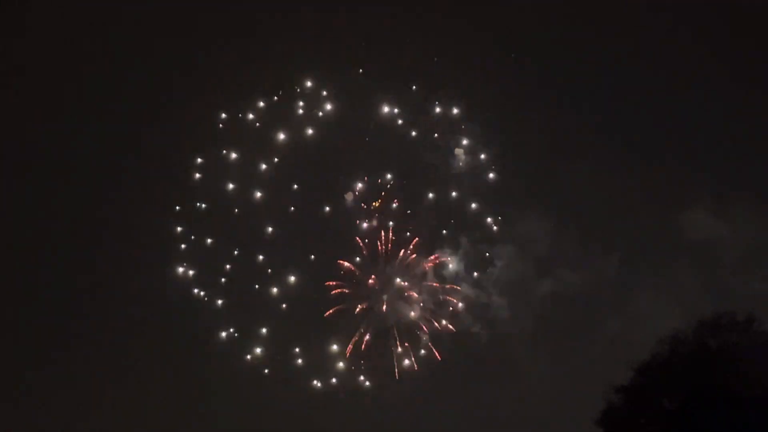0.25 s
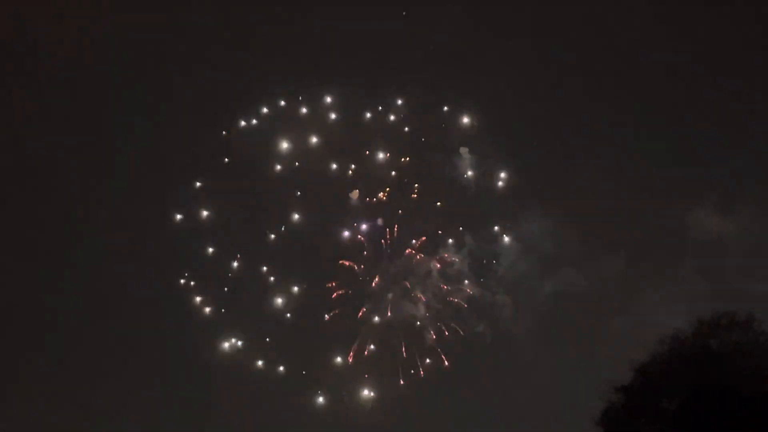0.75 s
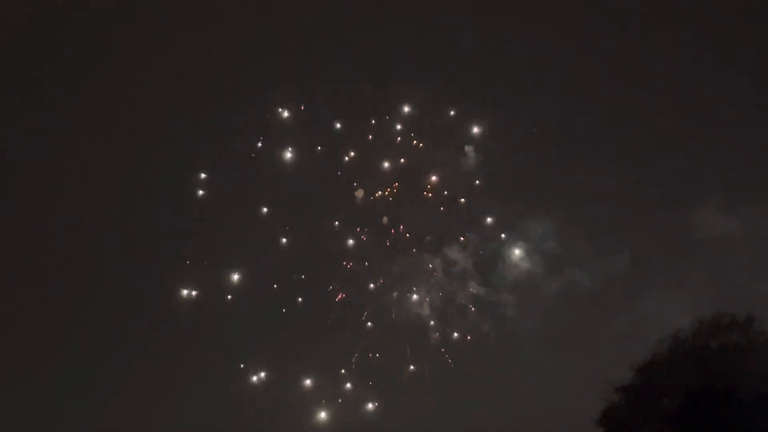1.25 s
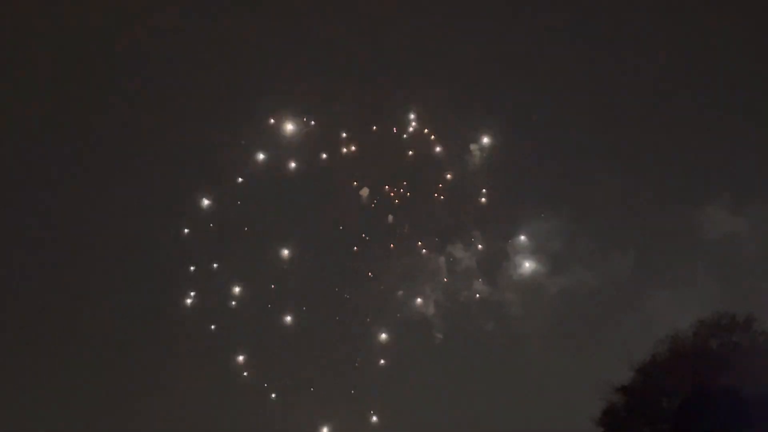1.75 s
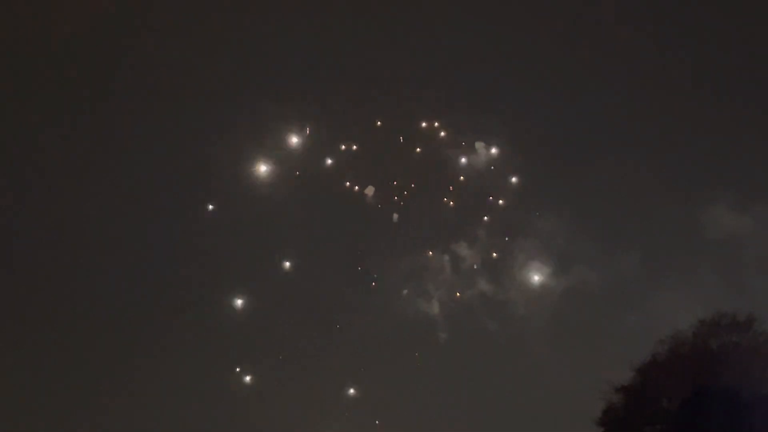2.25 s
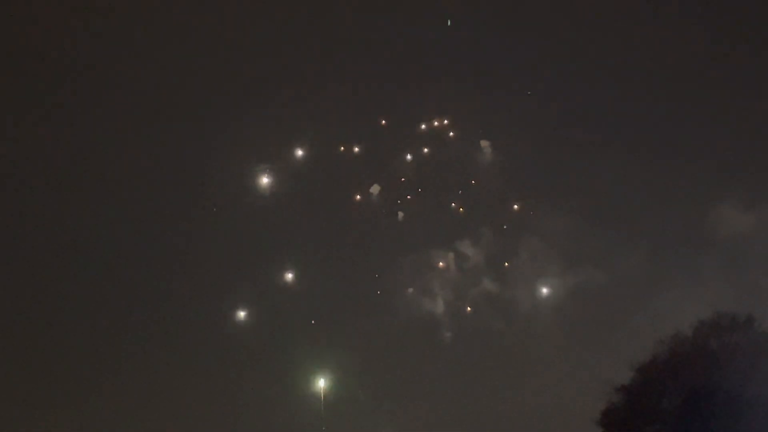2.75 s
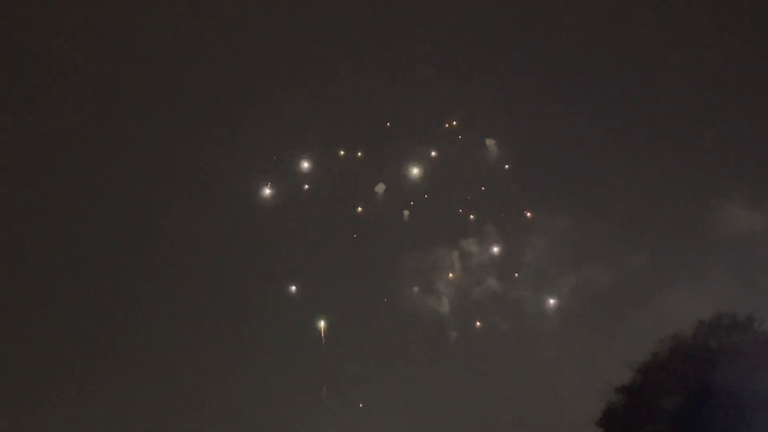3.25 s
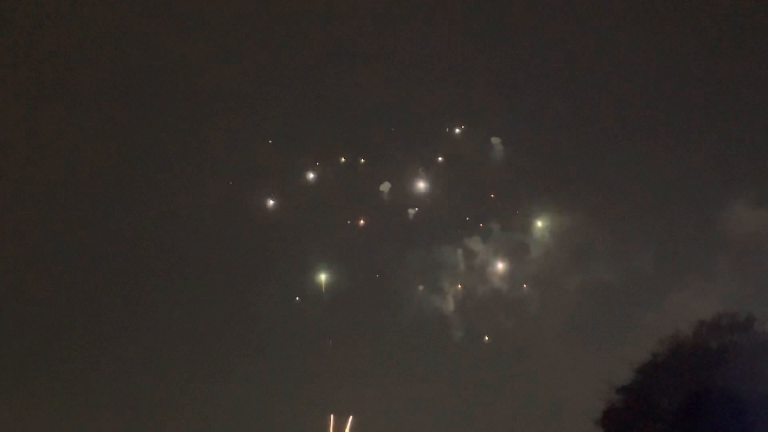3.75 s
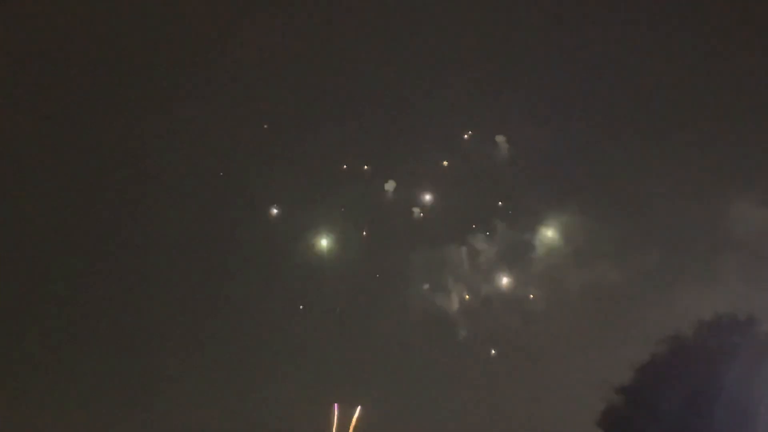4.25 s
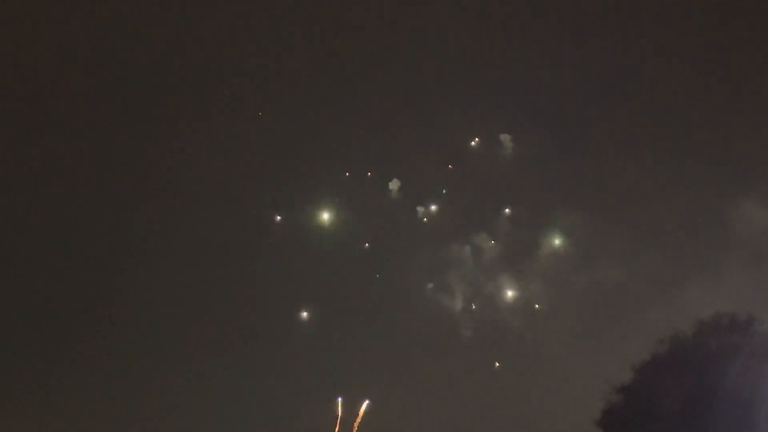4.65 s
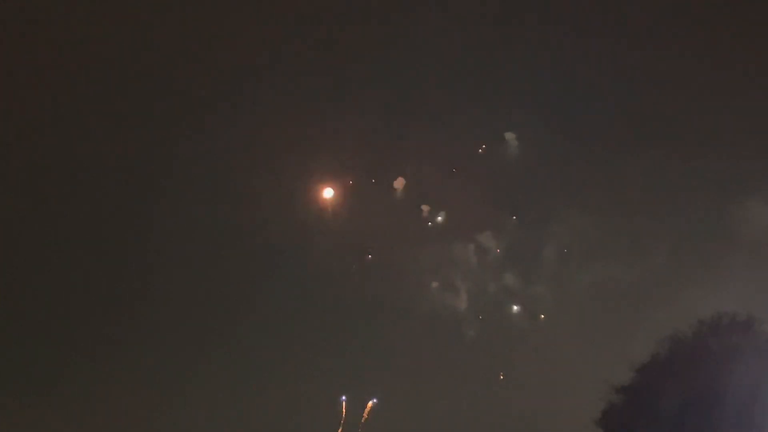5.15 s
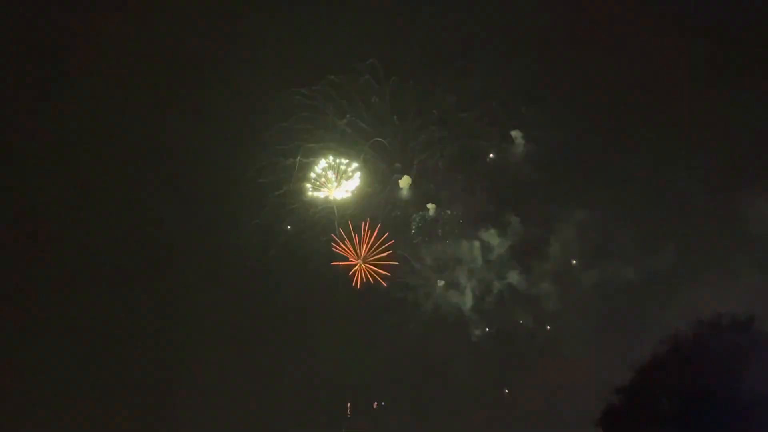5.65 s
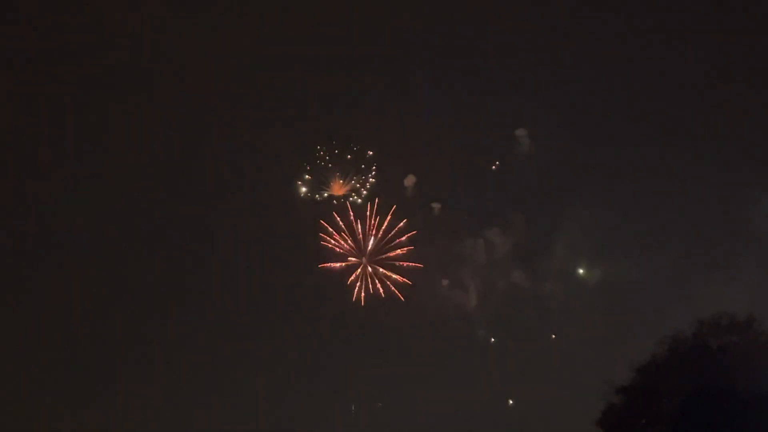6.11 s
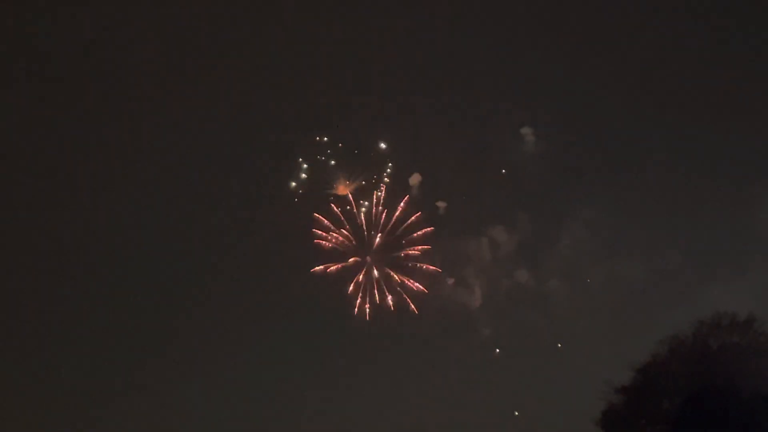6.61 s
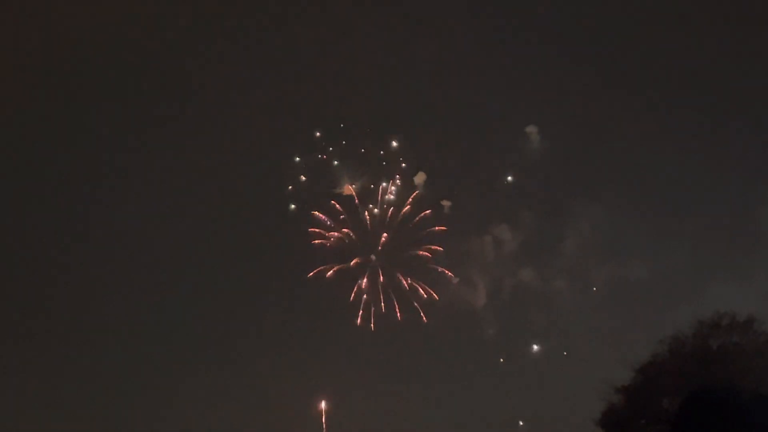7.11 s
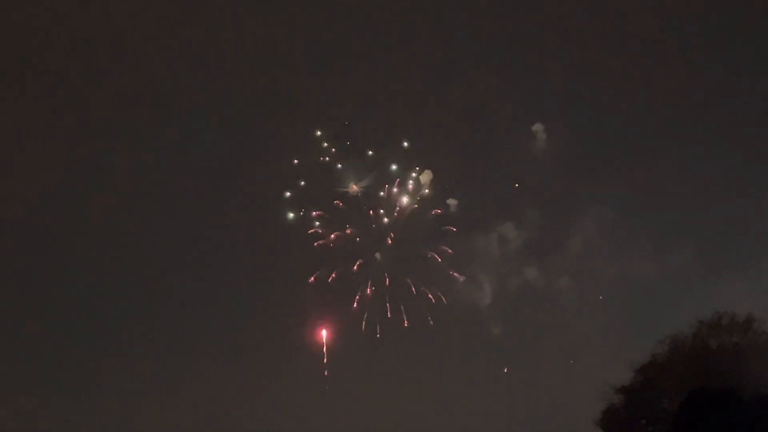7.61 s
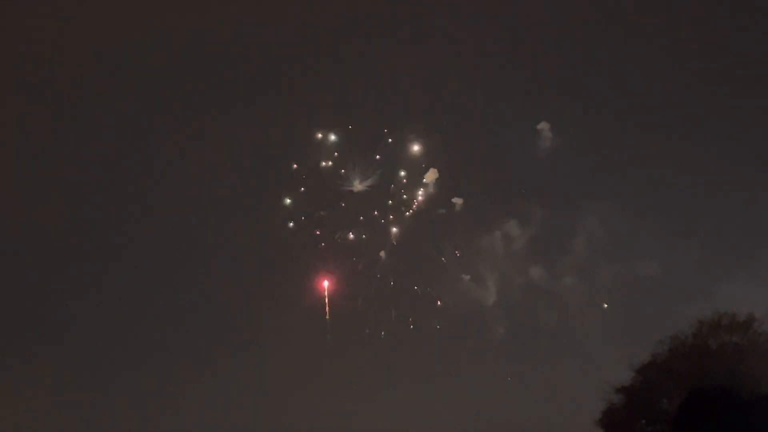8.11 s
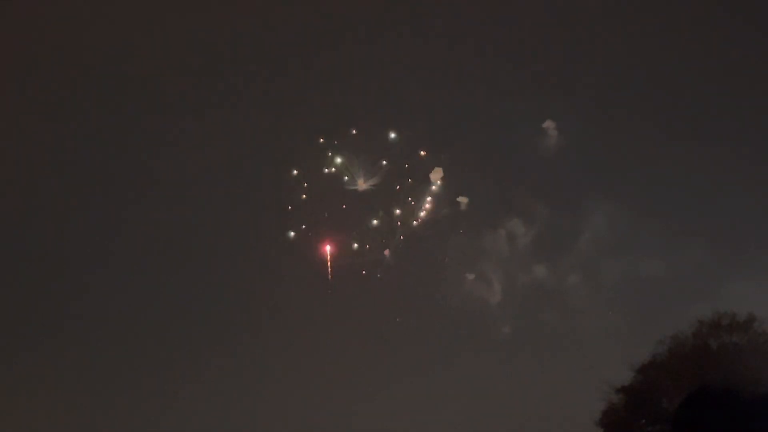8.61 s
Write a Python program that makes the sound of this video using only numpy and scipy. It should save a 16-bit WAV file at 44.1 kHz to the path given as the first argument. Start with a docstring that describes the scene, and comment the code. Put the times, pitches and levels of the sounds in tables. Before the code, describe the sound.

Spaced aerial firework bangs, each a hard crack falling into a deep boom, with quick echoes and a long rolling tail. Between them come ground mortar thumps, dull far thuds and soft distant pops. A low rumble and airy roar swell after every blast and sink in the pauses, over very faint high hiss. Open night field with trees and buildings around, closely spaced stereo microphones.

```python
"""A low rumble opens the scene and a shell soon cracks overhead: a firework display on a night field.
Shells and ground mortars are shaped pressure pulses, each with a quick reflection, near scatter,
slap echoes from buildings, a long roll and a soft swell from the far landscape.
Smeared pulses make far pops and thuds; shaped noise makes the rumble that sinks in the pauses,
the roar, the wash and a faint rustling hiss; a modulated tone makes a thin whine."""
import sys
import numpy as np
from scipy import signal
from scipy.fft import rfft, irfft, next_fast_len
from scipy.io import wavfile
from scipy.ndimage import uniform_filter1d, minimum_filter1d

SR = 44100
rng = np.random.default_rng(int(sys.argv[2]) if len(sys.argv) > 2 else 0)


def to_wav(sig):
    """Store sig (one row per channel, or 1-D mono) as 16-bit WAV at the path in sys.argv[1].

    Samples outside -1..1 are clipped; the rate is SR.
    """
    pcm = np.clip(np.atleast_2d(sig), -1, 1) * 32767
    pcm = np.round(pcm).astype(np.int16)
    wavfile.write(sys.argv[1], SR, pcm.T)  # frames by channels


N = 391166
# pulse filter length [samples] and its frequency axis [Hz]
TAPS = 8192
HZ = np.fft.rfftfreq(TAPS, 1 / SR)
# room ahead of a crack for its earliest paths [samples]
LEAD_IN = 512

# shells bursting overhead: (time [s], level [dB], crack gain [dB], top treble gain [dB],
#   body [Hz], body gain [dB], ground dip [Hz], ground dip gain [dB],
#   reflection delay [ms], reflection share [1], extra echo delay [ms], slap level [dB], slap [Hz])
BURSTS = [(0.3875, 1, 3.5, -7, 398, 18.5, 220, -8, 1.29, 0.45, 0.5, -12.5, 500),
          (1.8940, 3, 1.5, 6.5, 261, 10, 1020, -1, 2.67, 0.7, 5, -14.5, 450),
          (7.1675, 4, 6, -3, 357, 14, 1140, -16, 3.77, 0.9, 10.5, -15, 694)]
# mortars launching shells: the same columns as BURSTS
LIFTS = [(3.918, 2.5, -0.5, 3, 950, 10.8, 1124, -8, 1.1, 0.14, 0.97, -13, 434),
         (4.3089, -2.5, 1.5, -2, 820, 13.4, 437, -36, 1.385, 0.71, 0, -11.5, 720),
         (8.4112, 1, -7.5, 5, 1313, 7.8, 325, -2, 2.21, 1, 0, -11.5, 2600)]


def blasts(rows, colour, echoes, turns, lag_hz, ragged, spread_s, clean, near_db, roll_db,
           body_width=0.3, dip_width=0.13):
    """Superposition: the direct pulse, a quick reflection, scatter, slap echoes and roll add linearly."""
    # scatter from nearby trees: spectrum (frequency [Hz], level [dB]), decay (frequency [Hz], T60 [s])
    near_colour, near_t60 = [(60, -11.5), (250, -13.5), (700, -19.5), (2000, -19.5), (6000, -18)], [(60, 0.041), (500, 0.21), (2000, 0.15), (7000, 0.14)]
    # the long roll: spectrum (frequency [Hz], level [dB]), decay (frequency [Hz], T60 [s])
    roll_colour, roll_t60 = [(60, -6.5), (250, -14), (700, -15), (2000, -17), (6000, -14.5)], [(60, 2.74), (300, 2.4), (1000, 2), (3000, 1.75),
                                                  (7000, 0.42)]
    out = np.zeros((2, N))
    treble = HZ / (HZ + 800)
    top = HZ ** 2 / (HZ ** 2 + 4000 ** 2)
    for (s, db, crack_db, top_db, body_hz, body_db, dip_hz, dip_db,
         bounce_ms, bounce, extra_ms, slap_db, slap_hz) in rows:
        spectrum = read(colour, HZ) + crack_db * treble + top_db * top
        # the charge favours one band; soft ground swallows another
        body = body_db * band(body_hz, body_width)
        dip = dip_db * band(dip_hz, dip_width)
        direct = amp(db) * pulse(spectrum + body + dip, turns, lag_hz)
        direct = roughen(direct, ragged, spread_s)
        t = np.arange(len(direct)) / SR
        delayed = np.interp(t - bounce_ms / 10 ** 3, t, direct, left=0)
        reflection = np.clip(bounce, 0, 1) * delayed
        add(out, s - LEAD_IN / SR, direct + reflection)

        # trees and walls return the blast in uneven clumps
        wave = amp(db) * pulse(spectrum + body / 2, turns, lag_hz)
        near = tail(near_colour, near_t60, rise_s=0.0009, size=SR // 2)
        roll = tail(roll_colour, roll_t60, rise_s=0.098)
        roll = roll * lumps(2 * SR, rate=62, depth_db=3.5)
        add(out, s, amp(near_db) * convolve(wave, near))
        add(out, s, amp(roll_db) * convolve(wave, roll))

        # a facade favours one band in its slap
        facade = 7 * band(slap_hz, 0.38)
        for later_s, echo_db, treble_db, smear_s in echoes:
            # the longer path through the air dulls the slap by 1 dB per kHz
            slap_spectrum = spectrum + facade + treble_db * treble - HZ / 1000
            slap = amp(db + slap_db + echo_db) * pulse(slap_spectrum, turns, lag_hz)
            slap = convolve(roughen(slap, ragged, spread_s), scatter(smear_s, clean))
            add(out, s + later_s + extra_ms / 10 ** 3 - LEAD_IN / SR, slap)
    return out


def band(centre_hz, width):
    """Resonance shape: a bell of peak 1 on a log-frequency axis, its width a natural-log ratio."""
    return np.exp(-(np.log((HZ + 1) / centre_hz) / width) ** 2)


def pulse(db, turns=2.5, lag_hz=150):
    """Dispersion: a pulse of peak 1 whose bass arrives late, so it sweeps down from crack to boom."""
    log_gain = np.log(amp(np.maximum(db, -100)))
    # minimum phase: the Hilbert transform of the log gain gives the causal phase
    mirrored = np.r_[log_gain, log_gain[-2:0:-1]]
    causal = np.exp(np.conj(signal.hilbert(mirrored)))[:len(HZ)]
    dispersion = np.exp(-2j * np.pi * turns * HZ / (HZ + lag_hz))
    wave = irfft(causal * dispersion)[:TAPS // 2]
    return wave / abs(wave).max()


def roughen(wave, share, spread_s):
    """Multipath: uneven air splits the crack into early and late paths; the bass passes whole."""
    t = (np.arange(TAPS) - LEAD_IN) / SR
    paths = rng.standard_normal(TAPS) * np.exp(-abs(t) / spread_s)
    split = np.clip(share, 0, .95) * HZ ** 2 / (HZ ** 2 + 400 ** 2)
    whole = np.sqrt(1 - split) * rfft(1. * (t == 0))
    spread = np.sqrt(split) * rfft(paths / np.linalg.norm(paths))
    return irfft(rfft(wave, TAPS) * shallow(whole + spread))[:TAPS // 2]


def scatter(smear_s, clean):
    """Diffuse reflection: the bass returns clean, the treble partly as a dying spray."""
    spray = noise_pair(TAPS) * np.exp(-np.arange(TAPS) / SR / smear_s)
    spray = spray / np.linalg.norm(spray[0])
    split = (1 - np.clip(clean, 0, 1)) * HZ ** 2 / (HZ ** 2 + 200 ** 2)
    transfer = np.sqrt(1 - split) + np.sqrt(split) * rfft(spray)
    return irfft(shallow(transfer))[:, :TAPS // 2]


def shallow(transfer):
    """Interference softened: evens a many-path transfer's peaks and notches, keeping its time spread."""
    return transfer * np.sqrt(2 / (abs(transfer) ** 2 + .5)) * np.sqrt(np.pi) / 2


def tail(colour, t60, rise_s, size=2 * SR):
    """Reverberant decay: countless faint reflections, each band dying at its own speed."""
    hz, t, z = signal.stft(noise_pair(size), SR, nperseg=512)
    life = read(t60, hz)[:, None]
    decay = amp(read(colour, hz)[:, None] - 60 * t / life)
    # compensates the energy that a longer decay would add
    z = z * decay * np.sqrt(2 * np.log(1000) / (life * SR))
    rise = 1 - np.exp(-np.arange(size) / SR / rise_s)
    return signal.istft(z, SR, nperseg=512)[1][:, :size] * rise


def far_pops_and_thuds(pop_db=4, thud_db=-1):
    """Time spreading: distant pops and thuds are pulses blurred on their way."""
    # far pops, some of them late echoes of the blasts: (time [s], level before pop_db [dB], bass gain [dB])
    pops = [(3.453, -30.5, 2), (4.868, -39, -20), (5.154, -34.5, -12), (5.218, -30.5, 25), (5.347, -29, 3),
            (5.739, -35.5, 14), (6.389, -35.5, 12)]
    # spectrum of a far pop: (frequency [Hz], level [dB])
    pop_colour = [(30, -24), (120, -21), (330, -2), (620, 17), (1000, -9), (1700, -7.5), (2700, -19),
                  (4000, -53), (9000, -72)]
    # dull thuds farther still: (time [s], level before thud_db [dB], pitch [Hz])
    thuds = [(1, -18, 94), (1.249, -13, 125), (1.703, -18, 162), (3.014, -15, 138), (3.736, -12.5, 127),
             (5.221, -17, 122), (5.987, -17.5, 152), (8.239, -15, 175)]
    out = np.zeros((2, N))
    for s, db, bass_db in pops:
        spectrum = read(pop_colour, HZ) + bass_db / (1 + (HZ / 350) ** 2)
        wave = pulse(spectrum, turns=1.7, lag_hz=200)
        add(out, s, amp(db + pop_db) * convolve(wave, scatter(smear_s=.007, clean=0.19)))
    for s, db, hz in thuds:
        # the spectrum falls away on both sides of the pitch
        away = abs(np.log((HZ + 1) / hz))
        wave = pulse(-29 * away ** 2 / (1 + away / 10), turns=0.91, lag_hz=119)
        add(out, s, amp(db + thud_db) * convolve(wave, scatter(smear_s=.035, clean=0.21)))
    return out


def background():
    """Power addition: rumble, roar and wash rise and sink with the summed din of the blasts."""
    # spectra of the layers: (frequency [Hz], relative density [dB per Hz])
    rumble, roar, wash = [(15, -16), (30, -19), (48, -6.5), (80, -3), (130, -8), (200, -15), (280, -18.5),
                          (400, -38), (800, -58.5), (2000, -97)], [(50, -26.5), (110, -4.5), (160, 2), (220, -2), (280, -11.5),
                                          (400, -28), (900, -49.5), (2500, -99)], [(100, -20), (300, 0), (550, 6.5), (800, 3.5),
                                                        (1200, -5), (2000, -13.5), (3000, -21.5),
                                                        (4200, -28), (5200, -56.5), (7000, -50.5),
                                                        (9000, -80)]
    # layer levels: (steady [dB], with the lingering din [dB], with the far return [dB])
    rumble_mix, roar_mix, wash_mix = (-39.5, -36.5, -43.5), (-46, -42.5, -33), (-51, -47.5, -46.5)
    t, out = np.arange(N) / SR, 0
    din, returned = lingering(t), far_return(t)
    # the roar rolls unevenly, the wash only flutters
    rolling = lumps(N, rate=15, depth_db=1.67)
    flutter = lumps(N, rate=15, depth_db=0.74)
    layers = (rumble, rumble_mix, 1), (roar, roar_mix, rolling), (wash, wash_mix, flutter)
    for colour, (steady_db, din_db, return_db), wander in layers:
        power = amp(steady_db) ** 2 + amp(din_db) ** 2 * din + amp(return_db) ** 2 * returned
        out = out + open_air(colour) * np.sqrt(power) * wander
    return out


def lingering(t):
    """Energy build-up and decay: every blast feeds the power of the din, which sinks in the pauses."""
    build_s, sink_db_per_s = 0.39, 5
    ages = np.array([np.maximum(t - row[0], 0) for row in BURSTS + LIFTS])
    fed = (1 - np.exp(-ages / build_s)) * amp(-sink_db_per_s * ages) ** 2
    # earlier shells have left 0.5 dB of din in the air
    earlier = amp(0.5 - sink_db_per_s * t) ** 2
    return earlier + fed.sum(0)


def far_return(t):
    """Delayed diffuse reflection: power of one soft swell from the far landscape after each blast."""
    # swell after a burst and after a lift: (delay [s], half width to 1/e power [s], level [dB])
    kinds = (BURSTS, (1.34, 0.37, 0)), (LIFTS, (0.91, 0.056, -3.5))
    power = 0
    for rows, (delay_s, half_s, db) in kinds:
        for row in rows:
            power = power + amp(db) ** 2 * swell(t, row[0] + delay_s, half_s)
    return power


def hiss():
    """Stationary noise with power swells: faint high hiss with a few soft rustles."""
    # spectrum: (frequency [Hz], relative density [dB per Hz])
    hiss_colour = [(2000, -35.5), (4500, -4.5), (7200, -5), (8700, -20), (10200, -3.5), (10900, -5),
                   (11400, 3), (12000, -1.5), (12800, -10), (13500, -8.5), (15700, -11)]
    # soft rustles: (middle [s], half width to 1/e power [s], level [dB])
    rustles = [(1.501, .17, -70), (2.058, 0.014, -61.5), (2.455, .028, -63.5), (2.92, 0.039, -70),
               (3.67, .025, -68)]
    t = np.arange(N) / SR
    power = amp(-72.5) ** 2
    for s, half_s, db in rustles:
        power = power + amp(db) ** 2 * swell(t, s, half_s)
    return open_air(hiss_colour) * np.sqrt(power)


def whine(db=-81, hz=11400, width_hz=130, rate=30):
    """Amplitude modulation: slow noise on a tone makes a thin whine, pulsing evenly rate times a second."""
    t = np.arange(N) / SR
    lowpass = signal.butter(2, width_hz, fs=SR, output="sos")
    flutter = evened(signal.sosfilt(lowpass, rng.standard_normal(N)))
    pulsing = np.sin(np.pi * rate * t) ** 4
    return amp(db) * evened(flutter * np.sin(2 * np.pi * hz * t) * pulsing)


def open_air(colour):
    """Diffuse field: steady noise that arrives from all around."""
    return noise_pair(next_fast_len(N, real=True), colour, diffuse=True)[:, :N]


def noise_pair(size, colour=((1, 0), (2, 0)), diffuse=False):
    """Partial coherence: coloured noise at two closely spaced microphones."""
    # left-right likeness of a diffuse field and of blast reflections: (frequency [Hz], likeness [1])
    diffuse_likeness, blast_likeness = [(30, .7), (90, .75), (220, .9), (450, .75), (650, .85), (1100, .6),
                                        (1900, .98), (5000, .92), (12000, .9)], [(30, .99), (250, .99), (550, .8), (1100, .85),
                                                      (1900, .98), (6000, .9)]
    # phase by which the left microphone leads: (frequency [Hz], lead [rad])
    left_lead = [(30, .3), (380, .25), (800, 1.1), (1300, .15), (2000, 0), (4000, .3), (12000, .2)]
    hz = np.fft.rfftfreq(size, 1 / SR)
    left, other = rfft(rng.standard_normal((2, size)))
    same = read(diffuse_likeness if diffuse else blast_likeness, hz)
    right = same * left + np.sqrt(1 - same ** 2) * other
    if diffuse:
        right = right * np.exp(-1j * read(left_lead, hz))
    return evened(irfft(np.array([left, right]) * amp(read(colour, hz)), size))


def lumps(size, rate, depth_db):
    """Random amplitude modulation: a gain of RMS 1 that takes a new course rate times a second."""
    knots = rng.standard_normal(4000)
    place = np.arange(size) / SR * rate
    return evened(amp(depth_db * np.interp(place, np.arange(len(knots)), np.clip(knots, -2, 2))))


def swell(t, middle_s, half_s):
    """Gaussian envelope: a smooth rise and fall of power, 1 at its middle."""
    return np.exp(-((t - middle_s) / half_s) ** 2)


def amp(db):
    """Decibel law: 20 dB is a factor of ten in amplitude."""
    return 10 ** (np.asarray(db) / 20)


def evened(x):
    """Normalisation to an RMS of 1, over both channels together."""
    return x / np.sqrt(np.mean(x ** 2) + 1e-20)


def read(points, hz):
    """Interpolation by straight lines on a log-frequency axis."""
    f, value = np.transpose(points)
    return np.interp(np.log(hz + 1), np.log(f + 1), value)


def add(mix, s, sound):
    """Superposition: mixes a sound in at time s."""
    part = mix[:, round(s * SR):][:, :sound.shape[-1]]
    part += sound[..., :part.shape[1]]


def convolve(a, b):
    """Linear filtering: convolves a sound with an impulse response, channel by channel."""
    return signal.fftconvolve(np.atleast_2d(a), np.atleast_2d(b), axes=1)


def scene():
    """Superposition of shells overhead, mortars on the ground, far pops and thuds and the night around."""
    # blast spectra: (frequency [Hz], level [dB])
    burst_colour, lift_colour = [(18, -43.5), (38, -16.5), (70, 4.5), (120, 8.5), (200, 0.5), (350, -9.5),
                                 (600, -10), (1100, -12.5), (1800, -16.5), (3000, -26), (4200, -39),
                                 (6500, -51), (9000, -84), (16000, -54.5)], [(18, -64.5), (36, -4.5), (65, 4.5), (105, 5.5),
                                                       (170, -11.5), (320, -23), (450, -8), (850, -16.5),
                                                       (1400, -17), (2200, -22), (3400, -33.5), (4500, -48),
                                                       (7000, -66), (11000, -144)]
    # slap and later echoes from buildings: (delay [s], level [dB], treble gain [dB], smear [s])
    burst_echoes, lift_echoes = [(.152, -6, -8.5, .009), (.186, -14, -10, .025), (.299, -15, -12, .006),
                                 (.341, -15, -12, .007), (.396, -20, -3, .01), (.463, -20, -10, .007)], [(.176, 1.5, -7.5, .005), (.197, -2, -30, .008),
                                                       (.212, -8, -11.5, .004), (.239, -11.5, -15, .006)]
    shells = blasts(BURSTS, burst_colour, burst_echoes, turns=2.963, lag_hz=220, ragged=0.11,
                    spread_s=0.0011, clean=0.19, near_db=6.5, roll_db=1.5)
    mortars = blasts(LIFTS, lift_colour, lift_echoes, turns=2.514, lag_hz=125, ragged=0.89,
                     spread_s=0.0023, clean=0.12, near_db=11.0, roll_db=0.5)
    return shells + mortars + far_pops_and_thuds() + background() + hiss() + whine()


def record(dry):
    """Transduction: two close microphones differ in level and phase; a limiter and a band limit follow."""
    # level difference of the microphones: (frequency [Hz], left minus right [dB])
    balance = [(30, -1.7), (250, -2), (500, -2.6), (1000, -.5), (4000, 0)]
    # phase by which the right microphone lags: (frequency [Hz], lag [rad])
    right_lag = [(1800, 0), (3000, .4), (5000, .6), (9000, 1.6), (12000, 0)]
    hold_s, ceiling, edge_hz = .005, .96, 15800
    size = next_fast_len(N, real=True)
    hz = np.fft.rfftfreq(size, 1 / SR)
    # each microphone takes half of the difference
    left = amp(read(balance, hz) / 2) * np.exp(.5j * read(right_lag, hz))
    x = irfft(rfft(dry, size) * np.array([left, 1 / left]), size)[:, :N]
    # the limiter holds long enough to stay clean on the booms
    width = max(int(hold_s * SR / 2), 16)
    gain = np.minimum(1, ceiling / (abs(x).max(0) + 1e-9))
    held = minimum_filter1d(gain, 2 * width)
    x = x * uniform_filter1d(uniform_filter1d(held, width), width)
    lowpass = signal.firwin(511, edge_hz, window=("kaiser", 9), fs=SR)
    return signal.oaconvolve(x, lowpass[None], "same")


dry = scene()
out = record(dry)
to_wav(out)
```